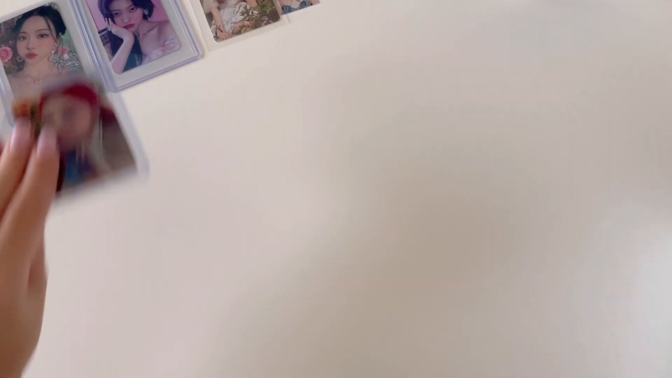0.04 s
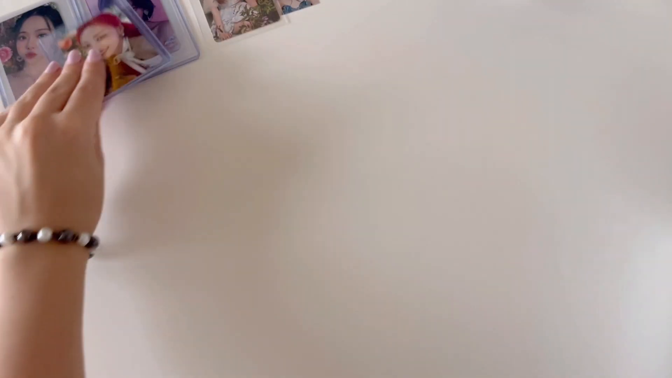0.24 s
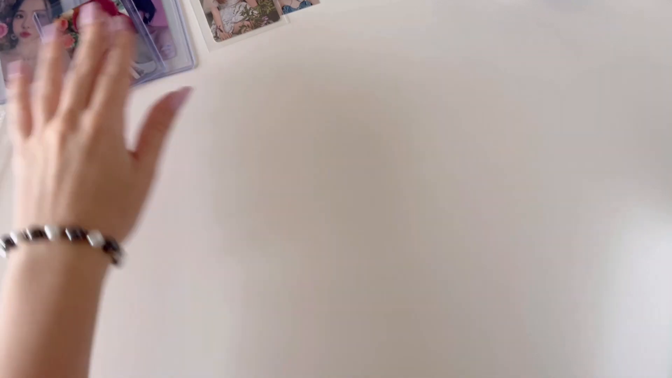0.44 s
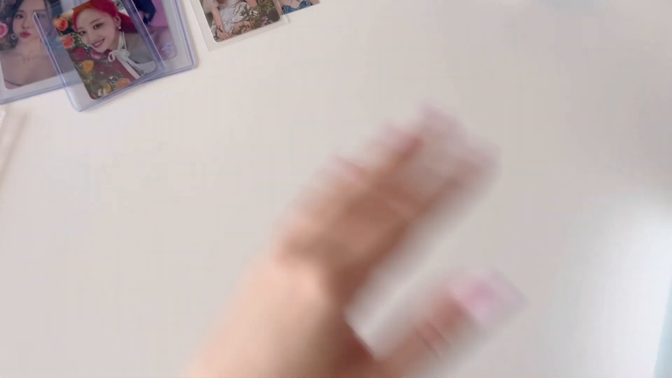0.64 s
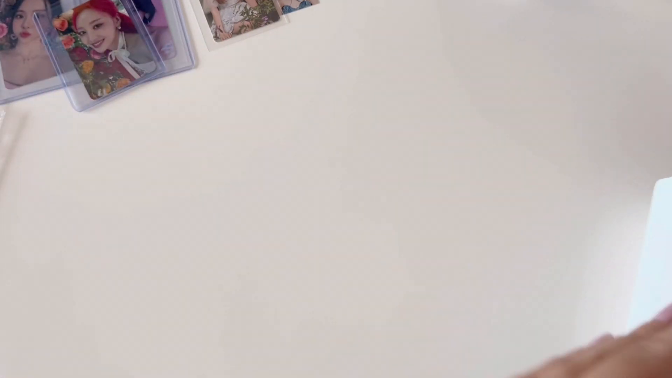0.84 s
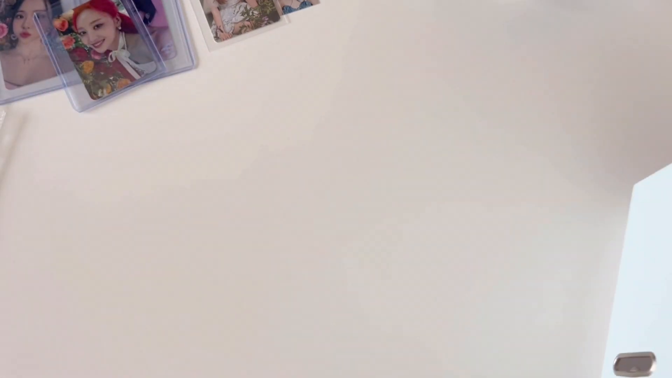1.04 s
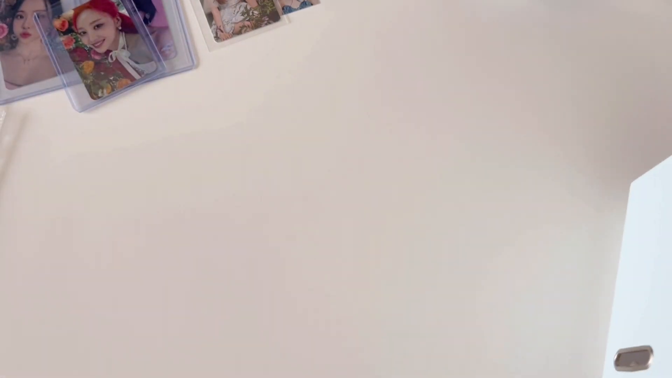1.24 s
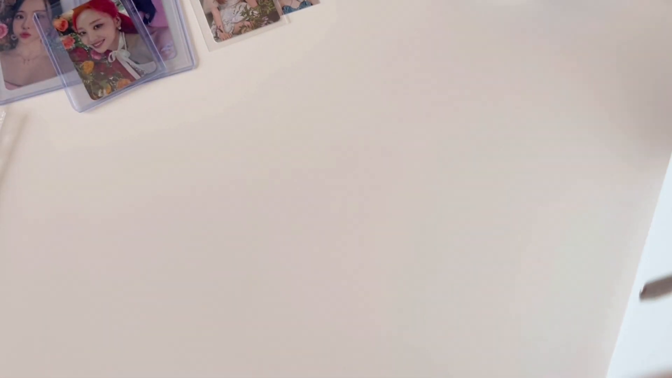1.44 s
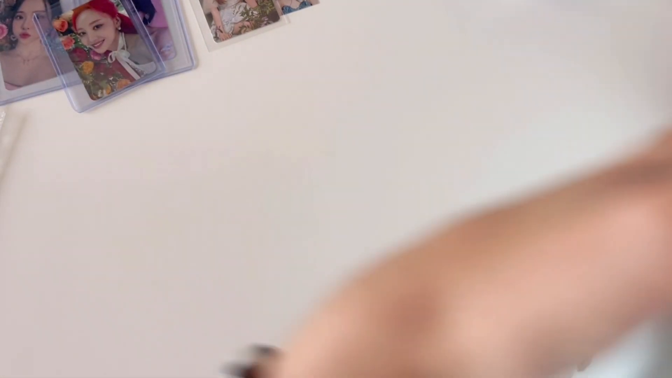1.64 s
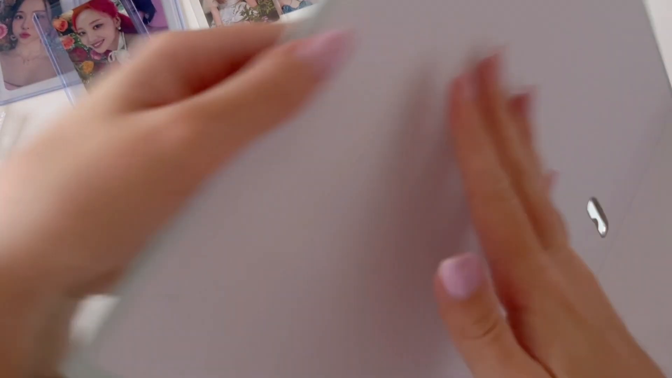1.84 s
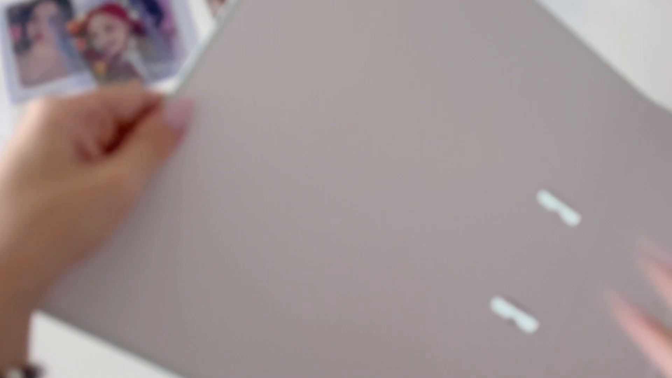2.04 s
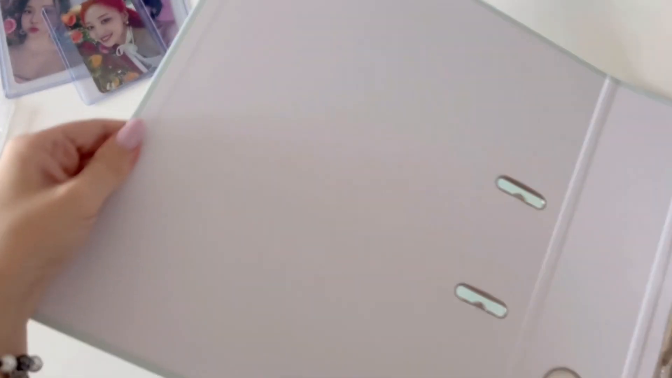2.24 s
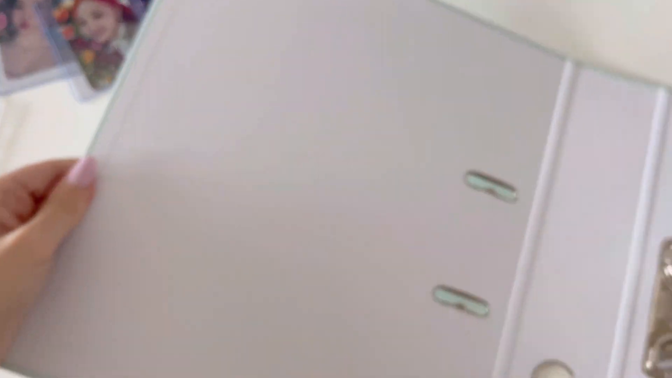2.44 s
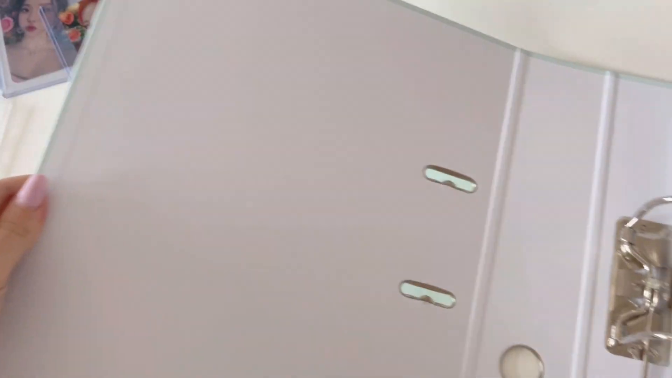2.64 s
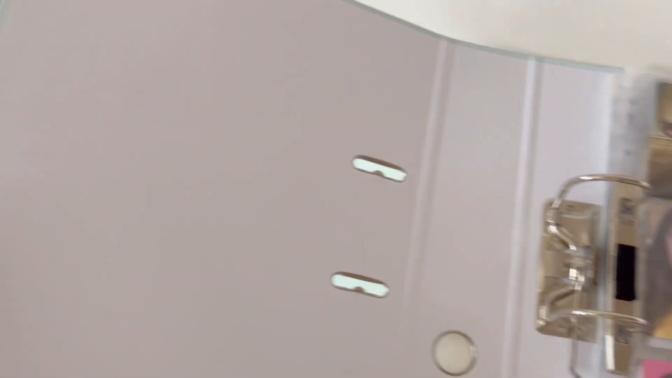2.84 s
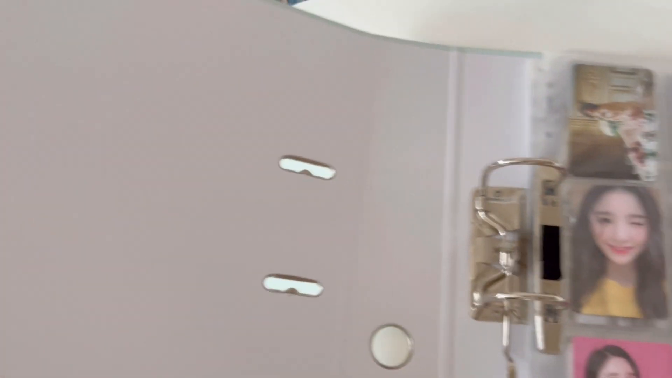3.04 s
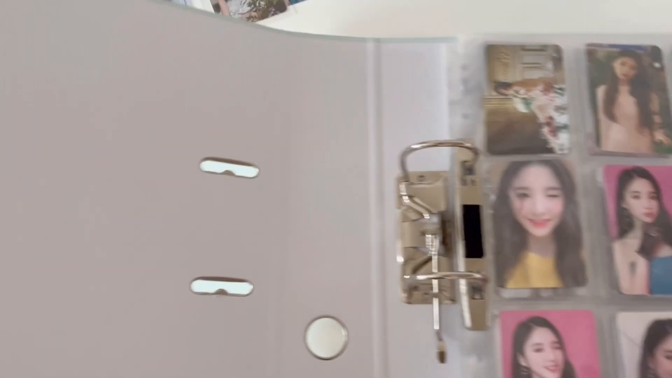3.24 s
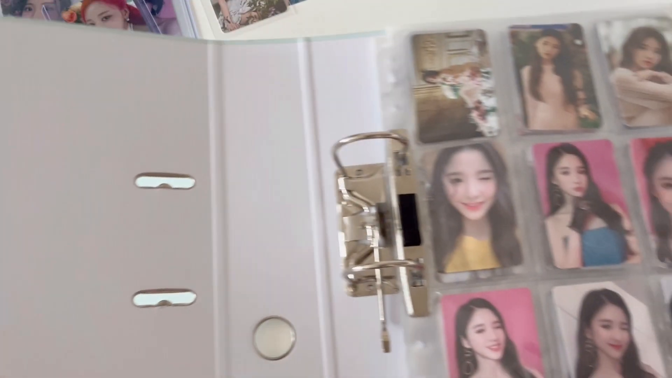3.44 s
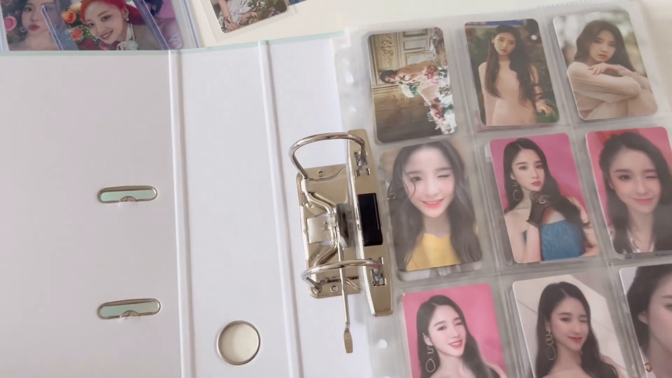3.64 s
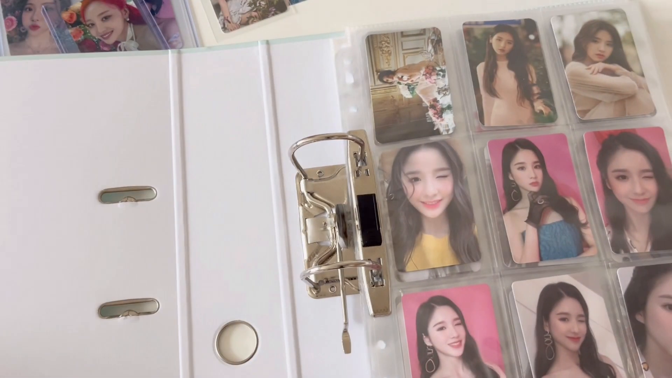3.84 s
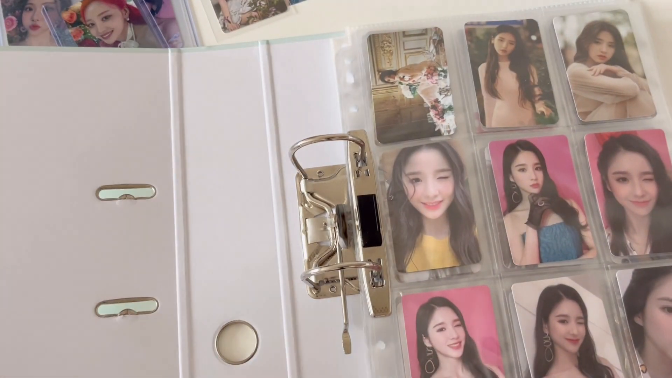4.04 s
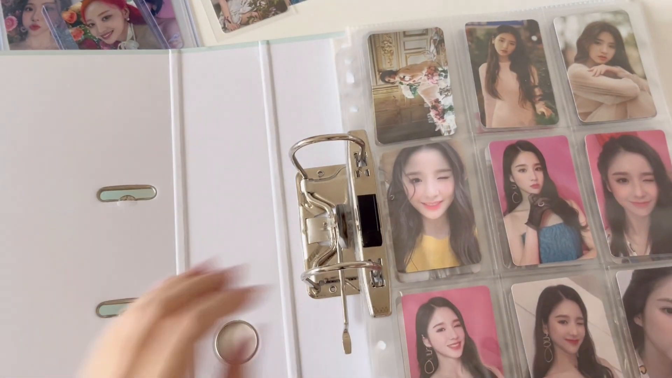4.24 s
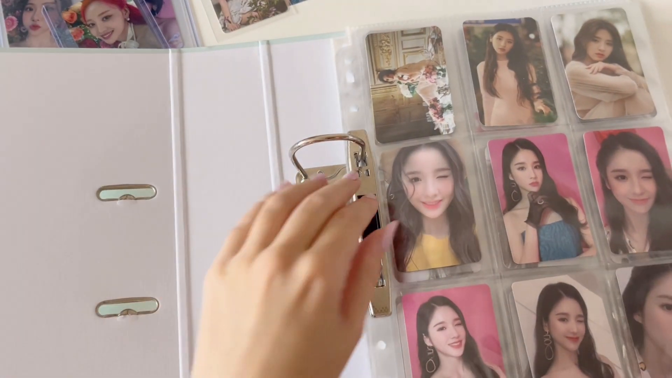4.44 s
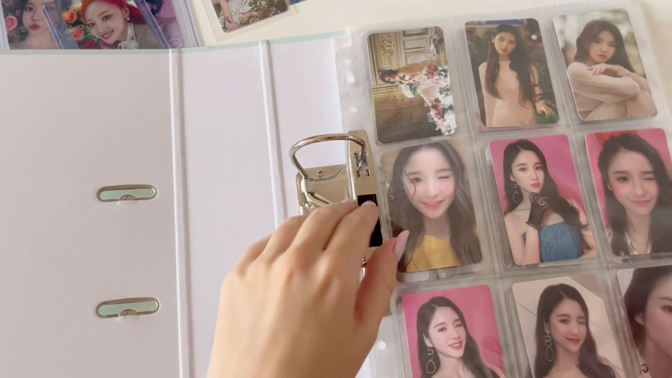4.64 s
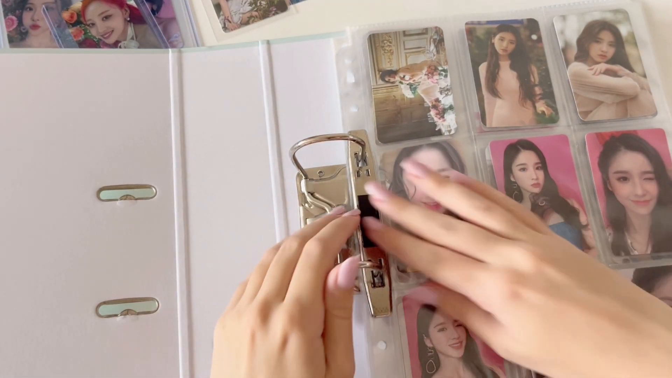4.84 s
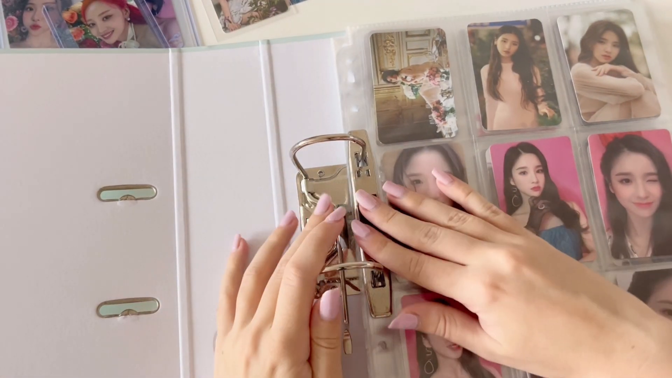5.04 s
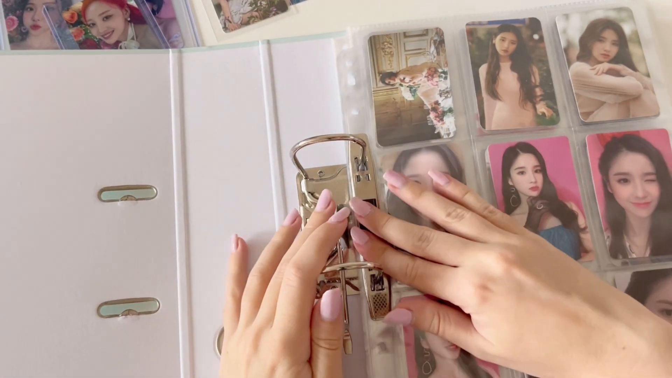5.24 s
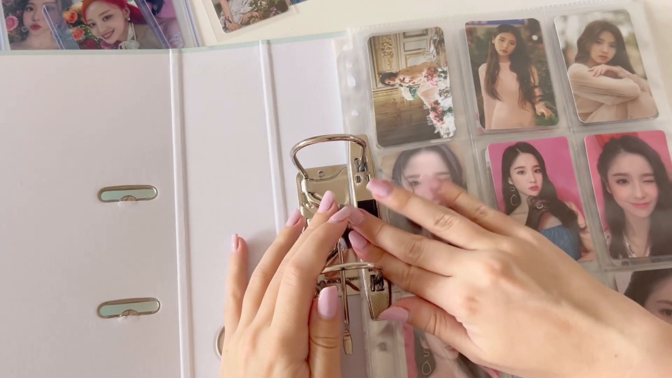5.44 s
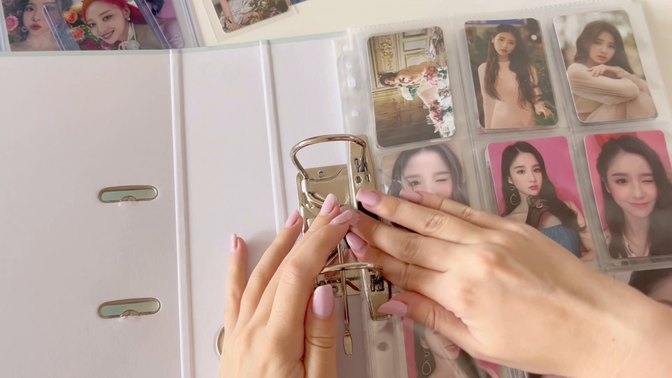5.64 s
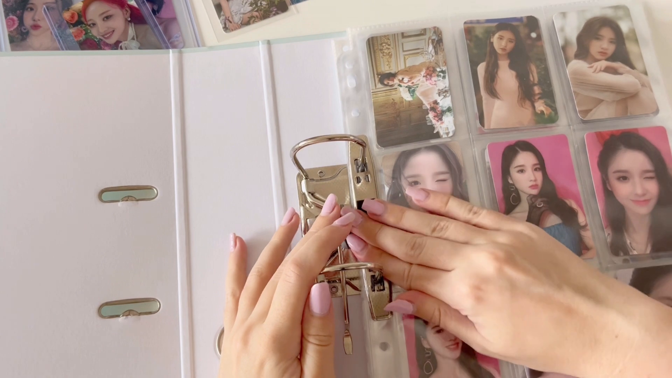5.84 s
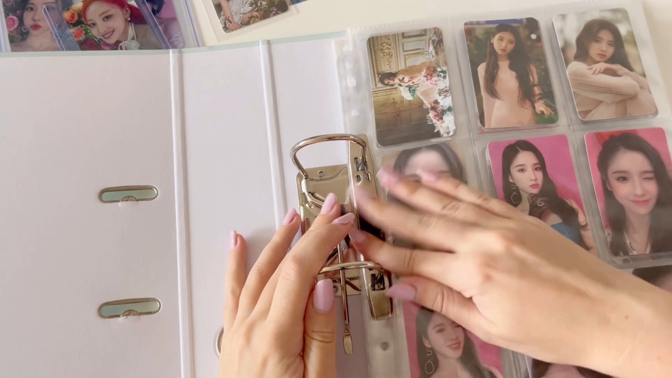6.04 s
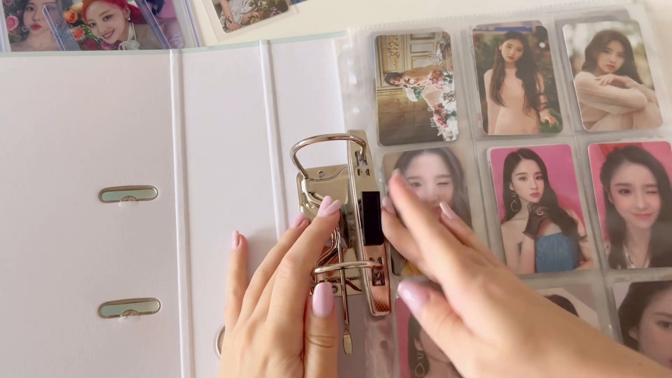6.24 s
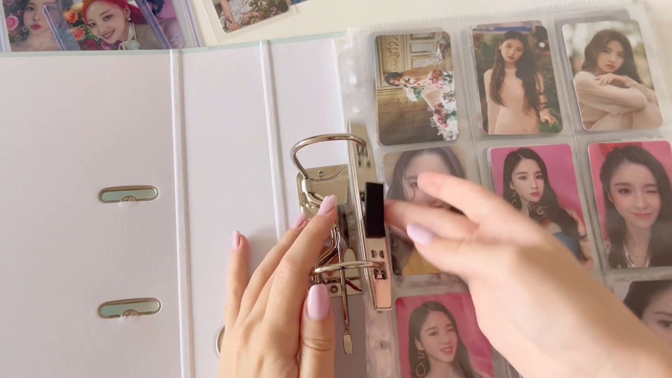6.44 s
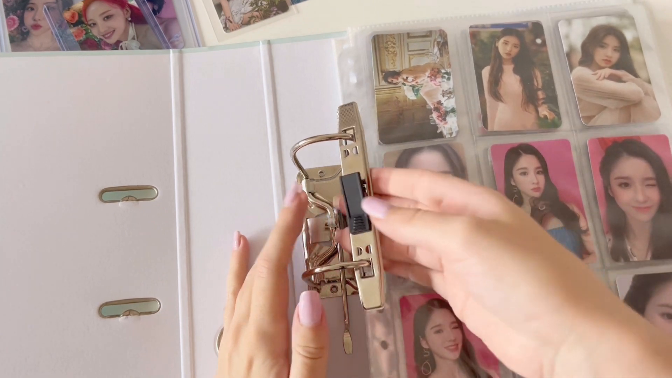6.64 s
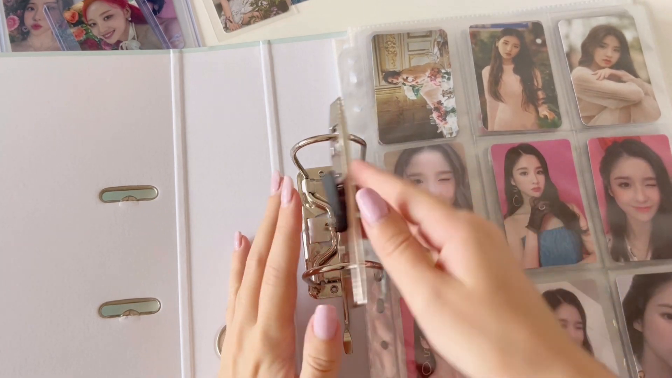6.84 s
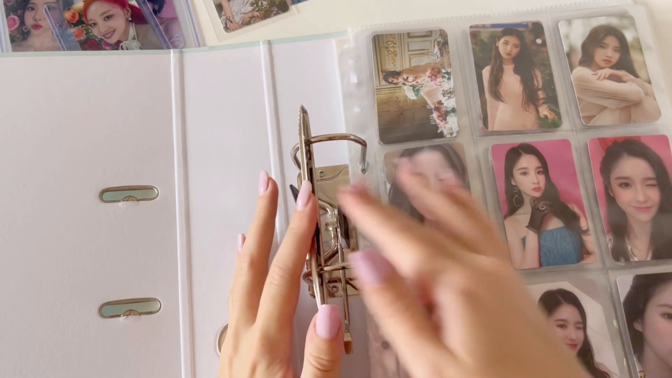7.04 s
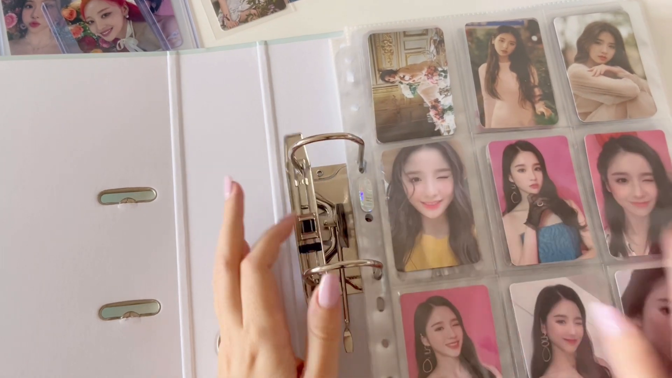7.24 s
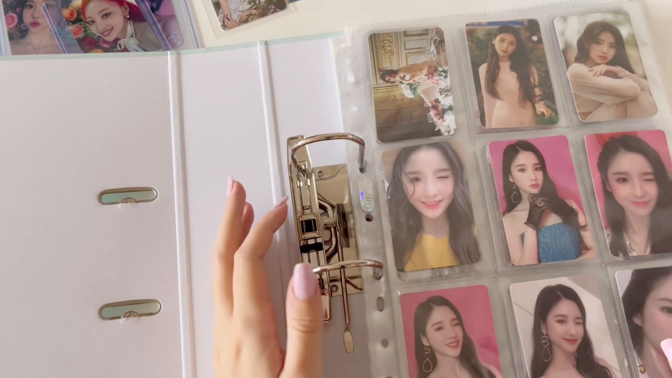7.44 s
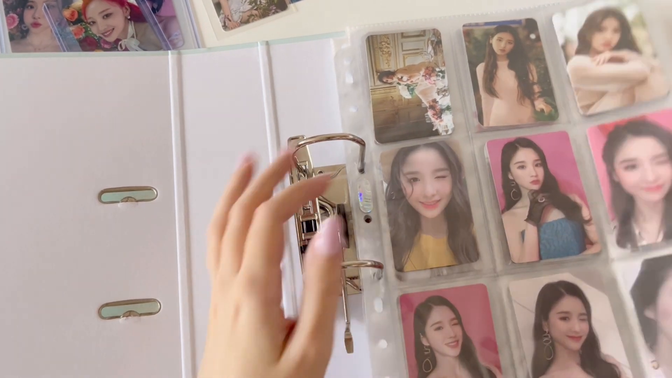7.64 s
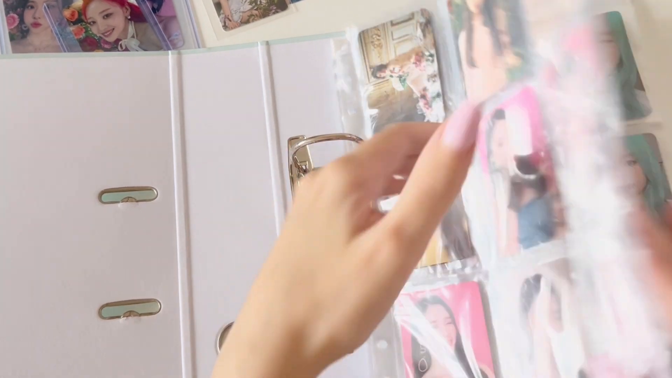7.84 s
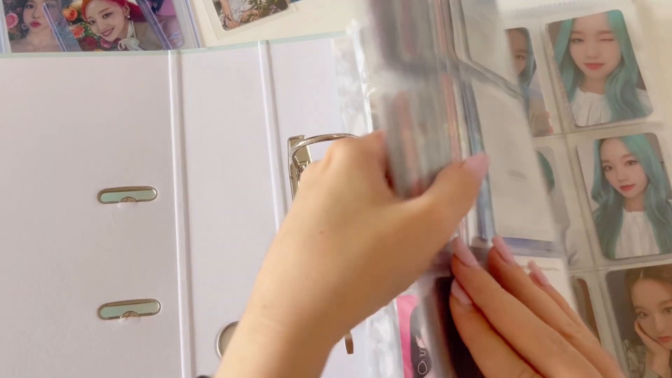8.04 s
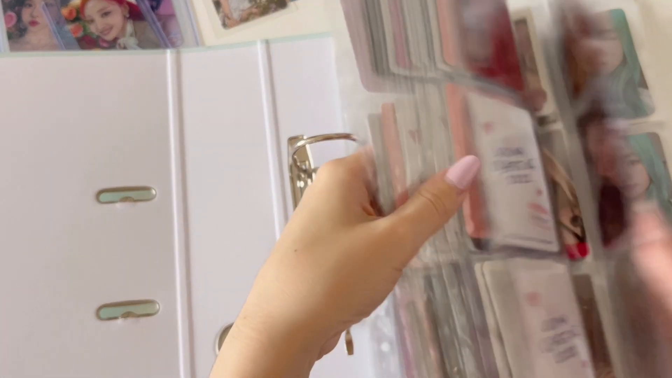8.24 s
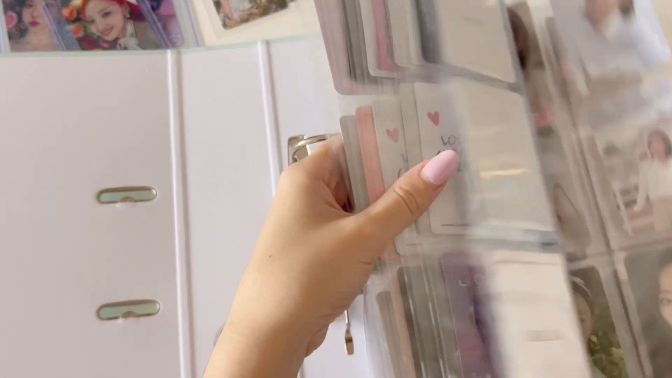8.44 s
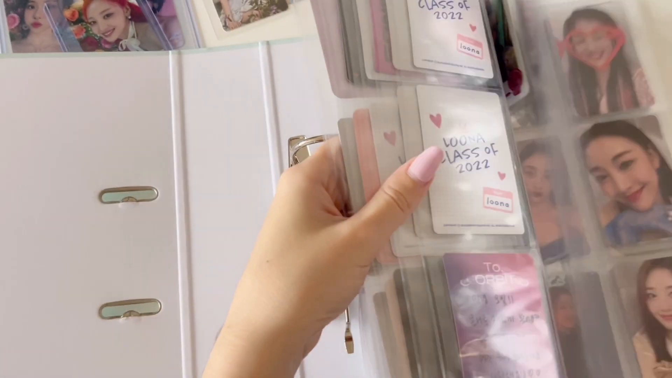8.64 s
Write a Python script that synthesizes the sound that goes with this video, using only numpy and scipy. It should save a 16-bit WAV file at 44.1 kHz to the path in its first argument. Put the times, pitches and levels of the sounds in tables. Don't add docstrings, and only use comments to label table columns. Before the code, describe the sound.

Tabletop handling heard by close stereo microphones: a flick and short swipe, soft rubbing, then broad sliding hisses and board bumps as a binder is opened. Things go quiet, with tiny metallic taps and ticks. A hard metallic snap bursts out, smaller knocks and another bright clank follow, and the end is dry crackling and rustling of plastic pages in a small room.

```python
import sys
import numpy as np
from scipy import signal
from scipy.fft import rfft, irfft, next_fast_len
from scipy.io import wavfile
from scipy.ndimage import uniform_filter1d

SR = 44100
rng = np.random.default_rng(int(sys.argv[2]) if len(sys.argv) > 2 else 0)


def pcm_store(signal):
    levels = np.round(np.clip(np.atleast_2d(signal), -1, 1) * 32767)
    wavfile.write(sys.argv[1], SR, levels.astype(np.int16).T)


def gain_from_db(level_db):
    decades = np.asarray(level_db, float) / 20
    return 10 ** decades


N = 383669


def read(points, hz):
    f, value = np.transpose(points)
    return np.interp(np.log(hz + 1), np.log(f + 1), value)


def evened(x):
    return x / np.sqrt(np.mean(x ** 2, -1, keepdims=True) + 1e-20)


def peaked(x):
    return x / abs(x).max(-1, keepdims=True)


def coloured(x, points):
    size = next_fast_len(N)
    hz = np.fft.rfftfreq(size, 1 / SR)
    return evened(irfft(rfft(x, size) * gain_from_db(read(points, hz)), size)[:, :N])


def band(noise, hz, share):
    size = noise.shape[-1]
    f = np.fft.rfftfreq(size, 1 / SR)
    return evened(irfft(rfft(noise) / (1 + ((f - hz) / (share * hz)) ** 2), size))


def wander(span):
    width = round(span * SR)
    noise = rng.standard_normal(N + 1)
    return evened(uniform_filter1d(uniform_filter1d(noise, width), width))[:N]


def patchy(x, depth_db, size):
    z = signal.stft(x, nperseg=256)[2]
    field = uniform_filter1d(rng.standard_normal(z.shape[1:]), size=2, axis=0)
    field = uniform_filter1d(field, size=size, axis=1)
    return signal.istft(z * gain_from_db(depth_db * field / field.std()), nperseg=256)[1][:, :N]


def placed(times, sounds):
    mix = np.zeros((2, N + sounds.shape[-1]))
    for k, s in enumerate(times):
        mix[:, round(s * SR):][:, :sounds.shape[-1]] += sounds[:, k]
    return mix[:, :N]


def joined(tables, extra):
    return np.transpose([(*row, e) for table, e in zip(tables, extra) for row in table])[..., None]


# [f/Hz, level/dB per Hz]
AIR_SPECTRUM = [(30, 0), (70, 3), (200, -17.5), (700, -15.5), (1050, -15), (1800, -44.5), (8000, -36.5),
                (16000, -29)]


def air():
    return gain_from_db(-69.5) * coloured(rng.standard_normal((2, N)), AIR_SPECTRUM)


# [f/Hz, width/Hz, level/dB]
WHINE_TONES = [(1030, 110, 3.5), (1540, 80, -2.5), (1780, 63, -8), (2040, 92, -13.5)]


def whine():
    start_s, length_s, level_db = 3.8, 0.93, -74.5
    t = np.arange(32768) / SR
    noise = rng.standard_normal((2, 1, 32768))
    tones = sum(gain_from_db(db) * band(noise, hz, 0.75 * width / hz) for hz, width, db in WHINE_TONES)
    swell = np.sqrt(abs(np.sin(np.pi * np.clip(t / length_s, 0, 1))))
    return placed([start_s], gain_from_db(level_db) * tones * swell)


# [t/s, peak level/dB,
# f/Hz, t60/s]
BLOWS = [(0.333, -34, 304, 0.068), (0.956, -34, 108.3, 0.33), (1.32, -36.5, 62, 0.17),
         (1.832, -31.5, 72.7, 0.22), (2.026, -33, 115, 0.25), (2.087, -21.5, 66, 0.12),
         (3.029, -29.5, 65.5, 0.16), (3.09, -20.5, 70, 0.23), (3.174, -30.5, 91, 0.34),
         (3.198, -33, 303, 0.11), (3.681, -40, 91, 0.12), (3.917, -42.5, 85, 0.15),
         (4.412, -40, 94.3, 0.37), (4.881, -40.5, 87.4, 0.44), (5.101, -33.5, 141.4, 0.31),
         (5.09, -41.5, 359, 0.36), (5.781, -16, 254.7, 0.13), (6.083, -33, 303, 0.097),
         (6.504, -32, 272, 0.17), (6.677, -42, 276, 0.2), (7.195, -26, 257, 0.34),
         (7.482, -43, 89, 0.2), (7.657, -39, 127, 0.092), (2.312, -24.5, 156, 0.13),
         (2.312, -18.5, 312, 0.044), (5.788, -36, 105.5, 0.23), (5.791, -18, 256.7, 0.099),
         (5.074, -44, 1172, 0.17), (5.125, -49, 414, 0.39), (7.212, -34, 408, 0.2),
         (7.199, -21.5, 83.5, 0.37), (7.204, -27, 133, 0.35), (7.4697, -19, 1540, 0.0091),
         (7.4708, -17.5, 2140, 0.0045), (.998, -44, 1110, .03), (1.033, -50, 1070, 0.027),
         (1.049, -38.5, 1080, 0.048), (.92, -37.5, 474, .05), (7.211, -26.5, 293, .03),
         (6.089, -24.5, 730, 0.021)]


def thuds():
    s, db, hz, t60 = np.transpose(BLOWS)[..., None]
    t = np.arange(8192) / SR
    noise = rng.standard_normal((len(s), 8192))
    swing = np.sin(2 * np.pi * hz * t) + 0.52 * band(noise, 0.92 * hz, 0.7)
    decay = gain_from_db(db + 2.5 - 60 * t / np.clip(t60, .003, .3))
    sound = decay * np.minimum(t * hz / 1.09, 1) * swing
    return placed(s[:, 0], np.array([sound, sound]))


# [t/s, length/s, speed level/dB, weight level/dB]
SLIDING_MOVES = [(0.236, 0.11, -55, -47), (0.434, 0.14, -69.5, -52), (0.596, 0.45, -73.5, -83.5),
                 (0.902, 0.37, -67, -54), (1.336, 0.17, -51, -47), (1.54, 0.39, -56, -74.5),
                 (1.852, 0.13, -61, -65), (2.011, 0.11, -60, -37.5), (2.157, 0.68, -49, -49.5),
                 (2.669, 0.36, -45, -59), (3.094, 0.095, -68, -36), (3.059, 0.46, -44.5, -57),
                 (3.58, 0.05, -61.5, -53), (3.773, 0.19, -72.5, -53.5), (4.004, 0.41, -84.5, -70.5),
                 (4.424, 0.12, -72.5, -58.5), (4.65, 0.62, -77.5, -79.5), (5.106, 0.098, -88, -45),
                 (5.298, 0.4, -79, -86), (5.78, 0.46, -69, -62), (6.094, 0.089, -63, -48.5),
                 (6.321, 0.34, -68.5, -51.5), (6.69, 0.39, -94, -52), (7.12, 0.17, -57, -45),
                 (7.368, 0.059, -61.5, -60), (7.495, 0.08, -87.5, -55.5), (7.674, 0.3, -68.5, -56),
                 (7.877, 0.22, -62.5, -58), (8.137, 0.47, -71, -59.5)]
STILL_DB = [-86, -98.5, -68]


def contact():
    rise_db_per_s, fall_db_per_s = 255.5, 153.5
    start, length, speed_db, weight_db = np.transpose(SLIDING_MOVES)[..., None]
    s = np.arange(0, N / SR + .01, .004)
    shape_db = -rise_db_per_s * np.maximum(start - s, 0)
    shape_db = shape_db - fall_db_per_s * np.maximum(s - start - length, 0)
    board_db = 1.5 + weight_db + 0.53 * (speed_db - weight_db)
    levels = []
    for db, still_db in zip((speed_db, board_db, weight_db), STILL_DB):
        gain = np.sqrt(np.sum(gain_from_db(2 * (db + shape_db)), 0) + gain_from_db(2 * still_db))
        levels.append(np.interp(np.arange(N) / SR, s, gain))
    return levels


# [f/Hz, level/dB per Hz]
HISS_SPECTRUM = [(1500, 5), (3000, 10.5), (5000, 10.5), (8000, 6), (12000, 4.5), (15000, 2), (16500, -27.5)]
BOARD_SPECTRUM = [(150, 0.5), (420, 0), (800, -2.5), (1080, -2.5), (1350, -4), (1800, -4.5), (3500, -8),
                  (6000, -53)]
RUMBLE_SPECTRUM = [(25, -18.5), (50, 1.5), (90, 7), (160, 1.5), (260, -7), (500, -8), (900, -44.5)]


def slide():
    speed, board, weight = contact()
    grip = gain_from_db(1.1 * wander(.002) + .8 * wander(.01))
    hiss = coloured(grip * rng.standard_normal((2, N)), HISS_SPECTRUM)
    body = coloured(grip * gain_from_db(2.4 * wander(0.028)) * rng.standard_normal((2, N)), BOARD_SPECTRUM)
    rumble = coloured(gain_from_db(4.1 * wander(0.035)) * rng.standard_normal((2, N)), RUMBLE_SPECTRUM)
    return speed * hiss + board * body + weight * rumble


# [from t/s, snaps per s, level/dB over the board]
SLEEVE_SNAPS = (7.58, 270, 10)


def crinkles():
    start, per_s, over_db = SLEEVE_SNAPS
    t = np.arange(N) / SR
    strength = gain_from_db(3.2 * np.minimum(rng.exponential(1, N), 4))
    snaps = (rng.random(N) < per_s / SR) * (t > start) * strength
    kind = rng.integers(0, 6, N)
    u = np.arange(400) / SR
    sound = 0
    for k, hz in enumerate(np.geomspace(900., 5000., 6)):
        ring = np.sin(2 * np.pi * hz * u) * gain_from_db(-60 * u * hz / 7)
        sound = sound + signal.oaconvolve(snaps * (kind == k), ring)[:N]
    return contact()[1] * gain_from_db(over_db) * sound


# [t/s, length/s, level/dB, centre f/Hz]
FILM_RUBS = [(.226, 0.023, -34, 4900), (.538, 0.047, -60, 950), (.938, 0.017, -41, 1350),
             (3.45, 0.24, -50, 1830), (5.074, 0.14, -52, 915), (6.816, 0.05, -55, 1770),
             (6.83, 0.12, -51, 1650), (7.611, 0.019, -49, 1770), (7.746, 0.021, -46, 1680),
             (7.828, 0.014, -46, 1780), (7.878, 0.017, -43, 2720), (8.22, 0.018, -51.5, 3540),
             (8.545, 0.034, -50, 1100), (8.55, 0.019, -44.5, 2820)]
EDGE_SWIPES = [(0.404, 0.059, -54.5, 3070), (1.046, 0.04, -39.5, 3420), (1.07, 0.056, -46.5, 4800),
               (1.168, 0.037, -50, 5300), (3.848, 0.081, -59, 960), (6.317, 0.021, -48.5, 1780),
               (7.901, 0.059, -47.5, 2380), (7.903, 0.041, -45.5, 4840), (8.131, 0.018, -51, 1700),
               (8.41, 0.042, -54, 1390), (6.817, 0.18, -62, 3150)]
METAL_GRINDS = [(4.493, 0.089, -69.5, 1240), (6.182, 0.017, -56, 2000), (6.429, 0.068, -56, 1870),
                (6.46, 0.09, -46, 1900), (6.592, 0.016, -46.5, 1285), (7.138, 0.037, -49, 2210),
                (6.469, 0.01, -54, 1980), (0.009, 0.033, -72, 7900), (6.551, 0.014, -46, 1800),
                (7.184, 0.011, -43, 8000), (8.064, 0.024, -56, 3030), (4.025, 0.024, -76.5, 6000),
                (7.201, 0.0053, -22, 3510), (7.201, 0.011, -27.5, 900), (7.212, 0.007, -23, 866),
                (7.221, 0.016, -42, 1200), (7.245, 0.012, -37.5, 1250), (7.259, 0.004, -28, 8300),
                (7.262, 0.011, -43.5, 1300), (7.293, 0.032, -40, 1150), (8.266, 0.046, -59, 1810)]
STROKE_FIZZ_DB = [-13.5, -2, 8.5]


def scrapes():
    s, length, db, hz, fizz_db = joined([FILM_RUBS, EDGE_SWIPES, METAL_GRINDS], STROKE_FIZZ_DB)
    t = np.arange(8192) / SR
    a, b = rng.standard_normal((len(s), 2, 2, 8192)).transpose(1, 2, 0, 3)
    slips = gain_from_db(2.7 * evened(uniform_filter1d(rng.standard_normal((len(s), 8192)), 60)))
    swell = np.sin(np.pi * np.clip(t / (1.2 * length), 0, 1) ** .7) ** .7
    stroke = swell * evened(slips)
    film = band(a, hz, .8) + .6 * band(a, hz, .15)
    fizz = gain_from_db(fizz_db) * band(b, 8000.0, 0.99)
    return placed(s[:, 0], gain_from_db(db - 2.5) * stroke * (film + fizz))


# [t/s, peak level/dB, ring f/Hz, crack level/dB re peak]
DULL_POPS = [(0.307, -37, 1140, -12), (0.44, -38.5, 824, -14), (0.945, -27, 1070, -26),
             (0.954, -54, 1500, -15), (1.364, -29.5, 1840, -19), (1.377, -35, 1860, -17),
             (1.964, -42, 1350, -10), (3.75, -48, 1620, -5), (4.962, -46, 1050, -23),
             (5.01, -40, 1270, -32), (5.194, -39, 1220, -24), (5.323, -51, 1270, -23),
             (5.369, -46, 1290, -24), (5.652, -47.5, 969, -23), (6.025, -34, 970, -36),
             (6.04, -36.5, 1567, -15), (6.192, -37.5, 924, -14), (6.264, -48, 875, -26),
             (6.499, -25.5, 1780, 9), (7.734, -39.5, 745, 5), (7.756, -32.5, 1000, -21),
             (7.859, -42.5, 1360, -17), (7.882, -40, 1480, -16), (7.903, -33.5, 1750, -8),
             (7.918, -28, 1930, -14), (7.959, -33.5, 713, -20), (8.125, -43, 1740, -22),
             (8.145, -38, 990, -27), (8.201, -45.5, 1360, -24), (8.223, -40, 706, -17),
             (8.232, -33, 840, -19), (8.298, -44.5, 773, -7), (8.358, -42, 1370, -30),
             (8.394, -47, 1030, -19), (8.416, -38, 880, 0.5), (8.452, -41.5, 818, -25),
             (8.467, -43.5, 1490, -20), (8.544, -41, 1280, -8), (8.556, -34, 1090, -7),
             (8.597, -38.5, 1380, -26), (8.642, -29, 1440, -46.5)]
# [t/s, peak level/dB, ring f/Hz]
BRIGHT_SPARKS = [(0.453, -41, 4540), (0.785, -43, 11800), (0.9766, -34.5, 4500), (0.9832, -39, 2520),
                 (1.075, -38, 3600), (1.0824, -44, 4070), (3.78, -48, 8220), (4.0244, -57, 11700),
                 (4.2474, -64, 7920), (4.27, -47.5, 8040), (4.285, -46, 12300), (4.501, -48, 12500),
                 (4.6074, -46, 12900), (4.817, -64, 7370), (5.111, -44, 3720), (5.313, -47.5, 11700),
                 (5.388, -59, 7440), (5.472, -60, 4980), (5.7996, -25.5, 7560), (6.059, -50, 5330),
                 (7.169, -20, 12300), (7.3094, -27.5, 8100), (7.6949, -48.5, 3960), (7.869, -36, 4850),
                 (7.759, -33, 4850), (7.937, -36, 5200), (8.0858, -43, 5080), (8.524, -46, 4910)]


def pecks():
    rows = [(s, db - 2, hz, crack_db) for s, db, hz, crack_db in DULL_POPS]
    rows += [(s, db + 4, hz, -12.5) for s, db, hz in BRIGHT_SPARKS]
    s, db, hz, crack_db = np.transpose(rows)[..., None]
    t = np.arange(1024) / SR
    a, b = rng.standard_normal((len(s), 2, 2, 1024)).transpose(1, 2, 0, 3)
    snap = 2.2 * np.sin(2 * np.pi * hz * t) * gain_from_db(-60 * t * hz / 5.5)
    tail = band(band(a, hz, 0.47), hz, 0.7) * gain_from_db(-60 * t / (0.004 + 17 / hz))
    ring = peaked(snap + tail * np.minimum(t / 0.0013, 1))
    crack = band(band(b, 9500.0, 0.86), 11000.0, 1.0) * gain_from_db(-60 * t / 0.015)
    crack = peaked(crack * np.minimum(t / 0.0002, 1))
    return placed(s[:, 0], gain_from_db(db) * (ring + gain_from_db(crack_db) * crack))


# [t/s, peak level/dB, ring f/Hz, crack level/dB re peak]
EDGE_FLICKS = [(.227, -11, 3460, -30), (1.032, -27, 5200, -10), (1.048, -25, 5330, -12),
               (1.982, -27.5, 1290, -26), (1.993, -28.5, 3880, 2), (2.008, -24, 1030, -3.5),
               (2.025, -13, 5150, -34), (3.68, -34.5, 2850, -18.5), (4.884, -25, 4530, -6),
               (4.911, -25, 5000, -10), (5.358, -38.5, 1200, -46), (5.55, -51, 1500, -14.5),
               (5.709, -39.5, 1160, -33), (5.994, -28, 1680, -31.5), (6.015, -32, 1004, -31),
               (6.03, -30.5, 2610, -33), (6.077, -44.5, 3590, 1), (7.102, -36, 990, -10.5),
               (7.4, -34, 1840, -25), (7.4695, -23, 1860, -5.5), (7.614, -44.5, 960, -3),
               (7.8, -28.5, 1906, -47), (7.833, -28, 850, -39), (8.118, -38, 1660, -29),
               (8.268, -29, 1140, -36), (8.332, -39.5, 1080, -38), (8.589, -34.5, 1320, -43),
               (8.636, -28, 1210, -25.5), (4.862, -44, 3300, -30), (5.983, -44.5, 1780, -30),
               (7.62, -41.5, 1470, -15), (5.093, -51.5, 8500, 0), (2.049, -28, 8500, -15)]
BINDER_TAPS = [(.334, -24, 1450, -7), (0.879, -39.5, 880, -20), (.997, -25.5, 5480, -9),
               (1.782, -37.5, 1600, -13), (1.852, -37, 5100, -9), (2.404, -22.5, 2230, -29),
               (2.405, -24, 5100, -18), (3.788, -37.5, 955, -21), (4.79, -50, 1470, -29),
               (4.403, -45, 924, -10.5), (5.004, -36.5, 1800, -41.5), (5.031, -47, 1750, -23),
               (5.608, -34.5, 1580, -31), (5.78, -5, 3600, -3.5), (6.087, -22, 3210, -3.5),
               (6.7099, -28.5, 1800, -28), (6.961, -27.5, 1750, -31), (7.196, -19, 3500, -9),
               (7.655, -38, 850, -25), (7.677, -34, 1940, -18), (7.705, -35, 1810, -12),
               (7.753, -37.5, 1650, -33), (7.889, -26, 1360, -12.5), (7.937, -33.5, 750, -20),
               (8.143, -37.5, 983, -34), (8.513, -41.5, 1150, -29), (8.676, -36.5, 1080, -46)]
HARD_BUMPS = [(.166, -38, 875, -5.5), (0.407, -32.5, 4160, -43), (0.919, -43.5, 960, -35),
              (0.94, -28, 1120, -46), (1.825, -34.5, 1070, -13), (2.039, -24, 1640, -16),
              (2.054, -22.5, 1060, -2), (2.311, -31.5, 670, -26), (4.508, -40.5, 940, -11.5),
              (4.549, -40, 920, -7.5), (5.078, -36, 1260, -13), (5.262, -44, 1780, -37),
              (6.178, -37, 1830, -2), (6.329, -33.5, 1120, -9), (6.488, -28.5, 920, -1.5),
              (6.529, -27.5, 1580, -3.5), (6.596, -26, 1650, -17), (6.866, -39, 1800, -8),
              (6.94, -43.5, 4400, -14), (7, -41.5, 826, -12), (7.26, -31.5, 1210, -11),
              (7.291, -25, 930, -1)]
CONTACT_KNOCK_DB = [-24, -10, -1]
# [f/Hz, width as share of f, level/dB]
KNOCK_MODES = [(266.3, 0.034, -6.5), (388, 0.076, -7.5), (603, 0.38, -5.5)]


def ticks():
    s, db, hz, crack_db, knock_db = joined([EDGE_FLICKS, BINDER_TAPS, HARD_BUMPS], CONTACT_KNOCK_DB)
    t = np.arange(3072) / SR
    a, b, c = rng.standard_normal((len(s), 3, 2, 3072)).transpose(1, 2, 0, 3)
    snap = 2.5 * np.sin(2 * np.pi * hz * t) * gain_from_db(-60 * t * hz / 6) * np.minimum(t * hz / .6, 1)
    tail = (band(a, hz, .55) + .7 * band(a, hz, .1)) * gain_from_db(-60 * t / (.005 + 11 / hz))
    ring = peaked(snap + tail * np.minimum(t / .001, 1))
    crack = peaked(band(b, 8000.0, 1.0) * gain_from_db(-60 * t / 0.014) * np.minimum(t / 0.00035, 1))
    knock = sum(gain_from_db(m_db) * band(c, m_hz, share) for m_hz, share, m_db in KNOCK_MODES)
    knock = peaked(knock * gain_from_db(-60 * t / 0.13) * np.minimum(t / 0.0015, 1))
    sound = ring + gain_from_db(crack_db + 11.5) * crack + gain_from_db(knock_db - 0.4) * knock
    return placed(s[:, 0], gain_from_db(db - 2.0) * sound)


# [f/Hz, level/dB, t60/s]
LEVER_MODES = [(2370, -5, 0.11), (4660, -2.5, 0.26), (3680, -6, 0.11), (4900, -16, 0.16), (5240, -12, 0.13),
               (2960, -9, 0.12), (4070, -20, .09), (6460, -10, .05), (7310, -4, 0.072), (8300, -18, 0.098),
               (8500, -13, 0.2), (9150, -16, 0.097), (11050, -7.5, 0.19)]
# [t/s, level/dB]
LEVER_TAPS = [
    (4.882, -33.5),
    (4.912, -39),
]


def lever():
    s, db = np.transpose(LEVER_TAPS)[..., None]
    t = np.arange(8192) / SR
    noise = rng.standard_normal((2, len(s), 8192))
    ring = 0
    for hz, mode_db, t60 in LEVER_MODES:
        tone = .7 * np.sin(2 * np.pi * hz * t) + .7 * band(noise, hz, .003 / t60)
        ring = ring + gain_from_db(mode_db - 60 * t / t60) * tone
    return placed(s[:, 0], gain_from_db(db - 5.5) * ring)


# [f/Hz, level/dB, t60/s]
CLAMP_MODES = [(3320, 8, 0.019), (2130, -8, 0.034), (7700, -8, 0.012), (441.5, -12, 0.13), (547, -11, 0.07),
               (1160, -6, 0.018), (4600, -9.5, 0.0077), (867, -8, 0.015), (2600, -14.5, 0.027),
               (8200, -3, 0.009), (8680, -4, .02), (11100, -10, 0.025), (11200, -6.5, 0.026),
               (12900, -4, 0.015)]
# [t/s, level/dB, brightness/dB per octave]
CLAMP_STRIKES = [
    (5.78, -16.5, -3.7),
    (6.086, -25, 0),
    (7.197, -28, 4),
    (7.21, -28.5, 4.5),
    (6.528, -43.5, 9),
    (6.597, -40.5, -5),
    (6.71, -41.5, -3.5),
]


def clamp():
    s, db, bright_db = np.transpose(CLAMP_STRIKES)[..., None]
    t = np.arange(4096) / SR
    looseness = 1 + 0.012 * rng.standard_normal((len(CLAMP_MODES), len(s), 1))
    ring = 0
    for (hz, mode_db, t60), loose in zip(CLAMP_MODES, looseness):
        level_db = mode_db + bright_db * np.log2(hz / 2000) - 60 * t / t60
        ring = ring + gain_from_db(level_db) * np.sin(2 * np.pi * hz * loose * t)
    ring = gain_from_db(db) * ring
    return placed(s[:, 0], np.array([ring, ring]))


# [f/Hz, t60/s]
ROOM_DECAY = [(100, 0.36), (500, 0.17), (2000, 0.2), (6000, 0.26), (15000, 0.16)]


def room(x):
    hz, t, z = signal.stft(x, SR, nperseg=128, noverlap=96)
    power = uniform_filter1d(abs(z) ** 2, size=3, axis=1)
    keep = gain_from_db(-120 * (t[1] - t[0]) / read(ROOM_DECAY, hz))
    for k, r in enumerate(keep):
        power[:, k] = signal.lfilter([0, 0, 0, 0, 1 - r], [1, -r], power[:, k])
    a, b = rng.standard_normal((2, *z.shape))
    return signal.istft(np.sqrt(abs(power)) * (a + 1j * b), SR, nperseg=128, noverlap=96)[1][:, :N]


# [f/Hz, phase lead of the right port/rad, likeness 0-1, left-right level/dB]
PORT_PAIR = [(20, .25, .995, -.3), (150, .4, .98, -.9), (550, 1.5, .9, -3.6), (800, 1.2, .8, -3),
             (1050, 1.3, .8, .5), (1500, 2.3, .9, -.3), (2100, 2.2, .92, -.6), (2500, 1.55, .8, -1.8),
             (3000, 2.0, .8, -1.6), (3800, 4.4, .8, -.5), (4700, 5.2, .65, -2), (5100, 5.7, .85, -1.5),
             (5800, 5.25, .96, 0), (7500, 5.26, .94, 0), (10300, 5.27, .985, 0), (12000, 5.28, .94, 0),
             (16500, 5.3, .95, 0)]
# [f/Hz, level/dB]
PASS_BAND = [(20, -31), (48, -3), (70, -7.5), (15700, 0), (16100, -22.5), (16900, -35), (17100, -74)]


def ports(pair):
    lag_s = 10 / 44100
    size = next_fast_len(N + 4096)
    hz = np.fft.rfftfreq(size, 1 / SR)
    f, *columns = np.transpose(PORT_PAIR)
    lead, same, tilt_db = (np.interp(hz, f, c) for c in columns)
    same = np.clip(same, 0, 1)
    left, twin = rfft(pair, size) * gain_from_db(read(PASS_BAND, hz))
    turn = np.exp(.5j * (lead - 2 * np.pi * hz * lag_s)) / gain_from_db(tilt_db / 2)
    right = same * left + np.sqrt(1 - same ** 2) * twin
    return irfft(np.array([left / turn, right * turn]), size)[:, :N]


def scene():
    background = air() + whine()
    sliding = patchy(slide(), depth_db=1.8, size=90)
    strokes = patchy(scrapes(), depth_db=2, size=12)
    hits = crinkles() + strokes + pecks() + ticks() + lever() + clamp()
    return ports(background + sliding + thuds() + hits + gain_from_db(-7.5) * room(hits))


def low_pass(x):
    return signal.sosfilt(signal.butter(12, 16930, fs=SR, output="sos"), x)


def record(dry):
    limit = 1.15
    return low_pass(limit * np.tanh(dry / limit))


dry = scene()
out = record(dry)
pcm_store(out)
```